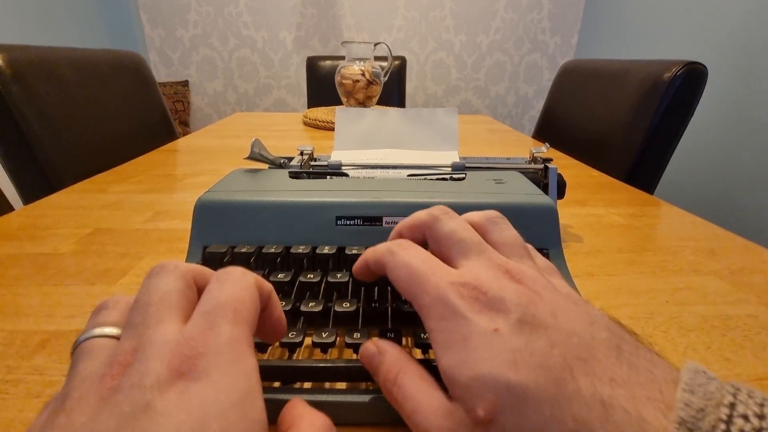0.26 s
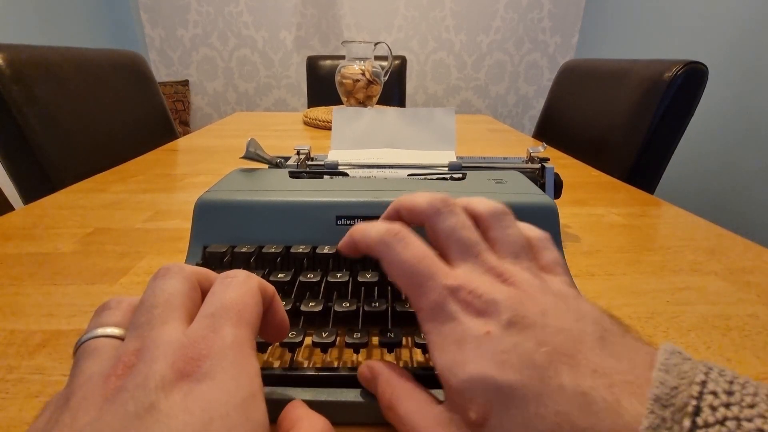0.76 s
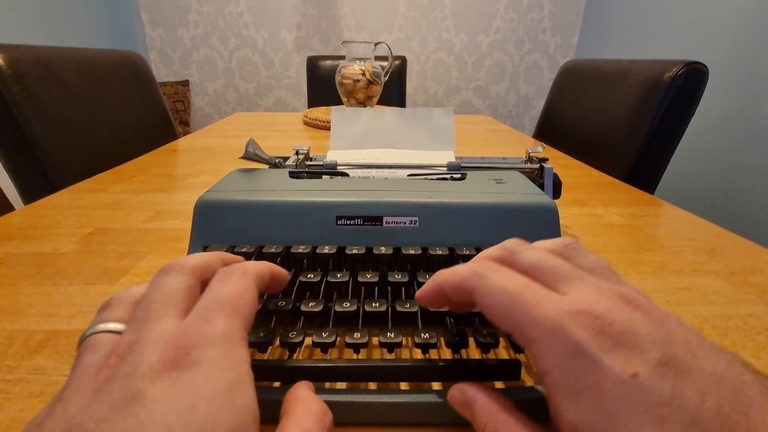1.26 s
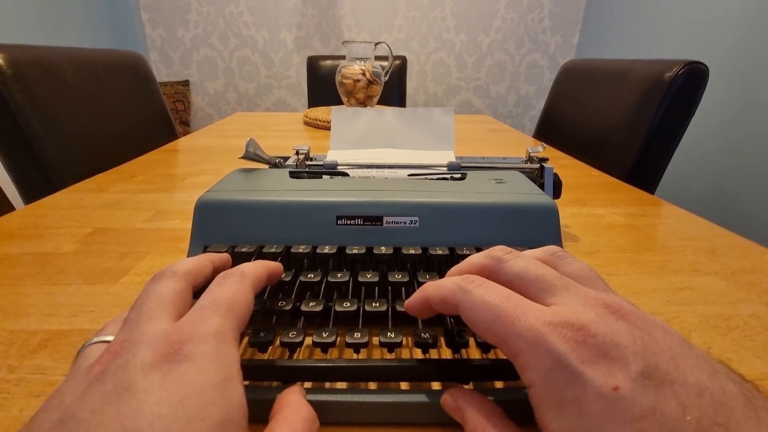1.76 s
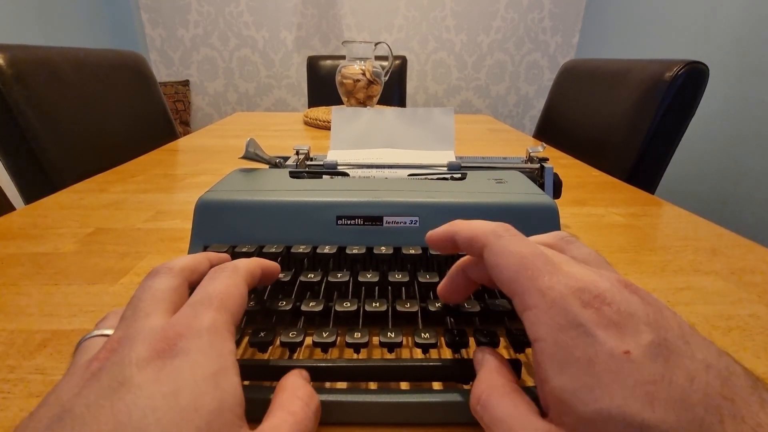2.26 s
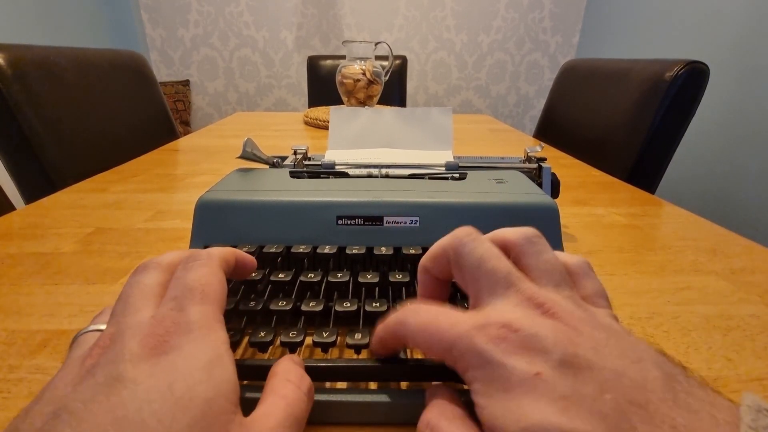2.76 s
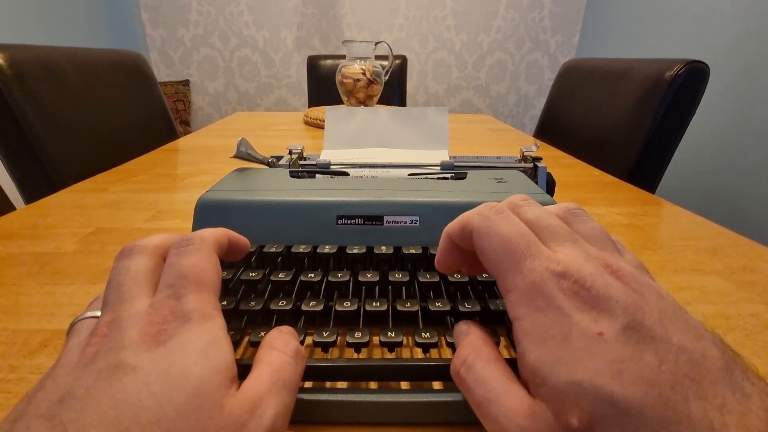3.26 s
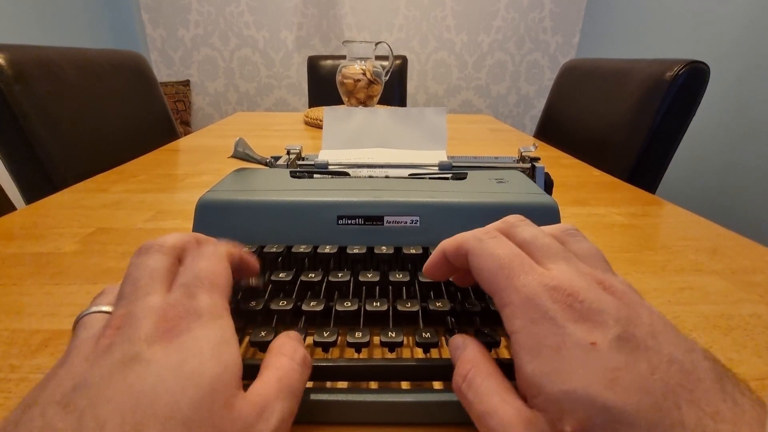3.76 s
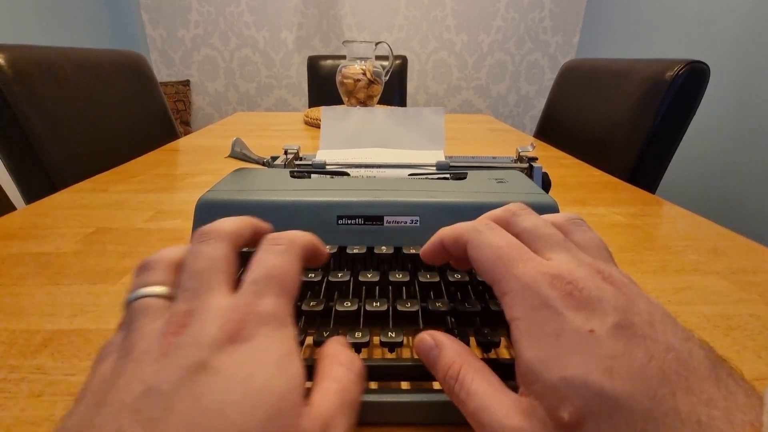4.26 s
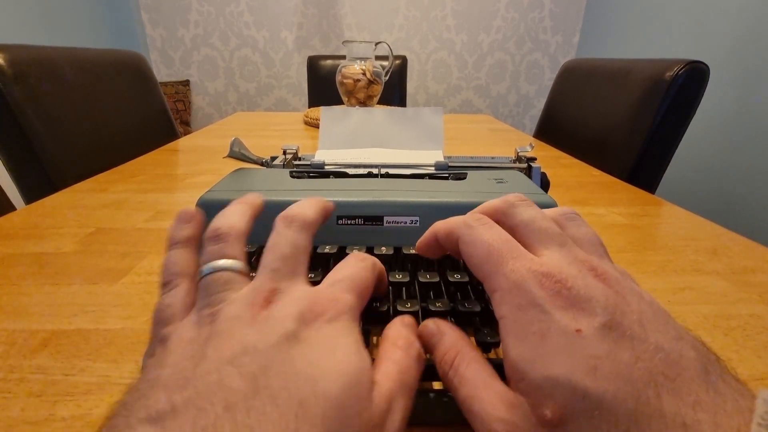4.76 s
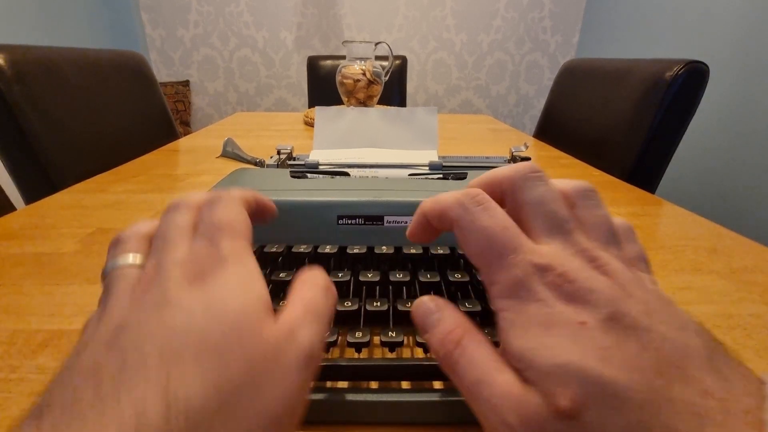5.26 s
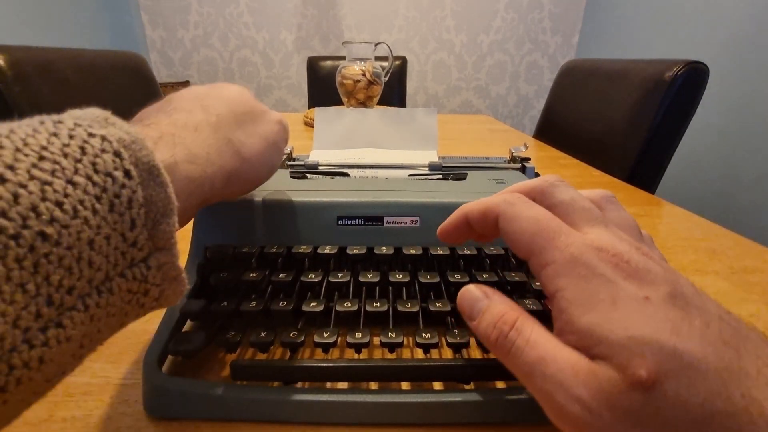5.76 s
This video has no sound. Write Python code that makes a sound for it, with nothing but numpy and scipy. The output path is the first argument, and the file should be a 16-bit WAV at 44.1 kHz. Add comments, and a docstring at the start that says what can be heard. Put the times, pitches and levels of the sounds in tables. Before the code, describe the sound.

A manual typewriter on a wooden table, heard close in a quiet, faintly humming room. One hard letter strike sits between duller space bar clunks, then a long pause, a quick run of three strikes, another strike and a space, and a final run of three. Each crack leaves a short metallic ring and low table thump. At the end the lever catches click and the carriage begins grating.

```python
"""A portable manual typewriter on a wooden table, typed on in short bursts in a quiet, faintly humming room.
Type bars crack on the platen as damped modes and ring the frame; keys and space bar thump table and case modes.
Linkages rattle as showers of tiny contacts, the escapement clicks as filtered noise bursts, springs sing on.
At the end a hand starts to push the carriage lever: catches click and ping, rails grate."""
import sys
import numpy as np
from scipy import signal
from scipy.fft import rfft, irfft
from scipy.io import wavfile

SR = 44100
rng = np.random.default_rng(int(sys.argv[2]) if len(sys.argv) > 2 else 0)


def master(y):
    """Save y as 16-bit WAV."""
    cut = np.clip(np.atleast_2d(y).T, -1, 1)
    pcm = np.round(cut * 32767)  # scale
    wavfile.write(sys.argv[1], SR, pcm.astype(np.int16))


N = 265923
T = np.arange(SR * 3 // 4) / SR  # time axis of one event, s
STEP_S = 0.026  # the carriage moves on by one letter

# Table levels are relative: each layer adds its own gain.
# letter keys: strike t/s, key travel/s, finger thump/dB, linkage/dB, key-bed thump/dB, crack/dB,
# frame ring/dB, rebound/dB, brightness/(dB per octave)
STRIKES = [(0.676, .032, -19.5, -27, -18.5, 2.5, -4, -11.5, -3.5),
           (2.696, 0.049, -31.5, -39.5, -20.5, -1, -1.5, -10.5, -7.5),
           (2.916, 0.037, -27, -29.5, -20, 0.5, -1, -7, -6.5),
           (3.187, 0.06, -27, -39, -24.5, -3, -3, -15, -8),
           (3.793, 0.039, -25, -32.5, -22.5, 3, -4.5, -13.5, -4),
           (4.854, .032, -20, -29, -24, 0.5, 1, -5, -8),
           (5.062, .043, -28.5, -34, -20.5, -2.5, 0, -4.5, -5),
           (5.254, 0.032, -24.5, -25.5, -20.5, 1, -2.5, -1.5, -5)]
# space bar pressed: t/s, click/dB, thump/dB, linkage/dB, travel to stop/s, clunk/dB
SPACE_DOWNS = [(0.2512, -17, -20, -34, 0.023, 1), (0.869, -20.5, -22, -37.5, .032, -14),
               (4.2297, -23.5, -24, -38, .036, -9.5)]
# space bar let go: t/s, click/dB, thump/dB, clunk/dB
SPACE_UPS = [(0.952, -20.5, -24.5, -13), (4.334, -23.5, -25.5, -8)]
# catches of the carriage lever: t/s, click/dB, ping f/Hz, ping/dB
CATCHES = [(5.874, -43.5, 4140, -23), (5.8885, -43.5, 2960, -17), (5.9799, -29, 3000, -13.5)]
# platen under a type slug, nominal modes: f/Hz, level/dB, t60/s
PLATEN_MODES = [(1180, -15.5, 0.0037), (1460, -10, 0.0024), (3000, -8.5, 0.0037), (3800, -10, 0.0071),
                (7010, -2.5, 0.0054), (8770, 2.5, 0.0034), (13380, 2, 0.0011)]
# linkage spectrum: f/Hz, level/dB
LINKAGE_COLOUR = [(350, -39.5), (600, 3.5), (779, -3.5), (1680, -4.5), (3120, -2.5), (3680, -1),
                  (4780, -4.5), (7620, -7), (11200, -15.5), (12500, -9.5), (14900, -12.5), (16000, -13)]
# case spectrum: f/Hz, level/dB
CASE_COLOUR = [(35, -28.5), (70, 7), (130, 13), (260, 0), (380, 3.5), (490, -8), (680, -1.5), (1100, -4),
               (1700, -12), (3000, -17.5), (8000, -43.5)]


def undb(db):
    """Decibels to gain."""
    return 10 ** (np.asarray(db) / 20)


def unit(x):
    """Scale to unit energy in each channel."""
    return x / np.sqrt(np.sum(x ** 2, axis=-1, keepdims=True))


def read(table, hz):
    """A table's value, interpolated on a log-frequency axis."""
    f, value = np.transpose(table)
    return np.interp(np.log(np.maximum(hz, 1)), np.log(f), value)


def colour(x, spectrum):
    """Filter by a (Hz, dB) spectrum."""
    size = x.shape[-1]
    gain = undb(read(spectrum, np.fft.rfftfreq(size, 1 / SR)))
    return irfft(rfft(x) * gain, size)


def add(track, s, piece):
    """Mix a piece into a track at time s."""
    i = max(int(s * SR), 0)
    track[..., i:i + piece.shape[-1]] += piece[..., :N - i]


def through(force, response):
    """Play a force through a stereo response."""
    return signal.fftconvolve(np.atleast_2d(force), response, axes=-1)[:, :N]


def field(size, wide_hz=420):
    """Diffuse noise at two ports: alike in the bass, unrelated in the treble."""
    mid, side = rng.standard_normal((2, size))
    side = colour(side, [(wide_hz / 4, -13), (wide_hz, 0)])
    return np.array([mid + side, mid - side])


def mode(hz, t60, phase=0):
    """One exponentially decaying resonance."""
    return np.sin(2 * np.pi * hz * T + phase) * np.exp(-np.log(1000) * T / t60)


def chime(modes, t60, scatter_db=2):
    """Distinct modes, excited a little differently by every blow, in a random phase at each port."""
    out = 0
    for hz, db in modes:
        gain = undb(db + scatter_db * rng.standard_normal())
        out = out + gain * mode(hz, t60, 2 * np.pi * rng.random((2, 1)))
    return unit(out)


def tick(spectrum, decay_s):
    """The dry snap of a struck part: a decaying burst of coloured noise."""
    t = T[T < 0.05]
    snap = unit(colour(field(len(t)), spectrum) * np.exp(-t / decay_s))
    return np.pad(snap, ((0, 0), (0, len(T) - len(t))))


def shower(rate, scatter_db):
    """Tiny contacts at random moments (rate per s), most of them faint; rms 1."""
    chance, size = rng.random(N), rng.exponential(size=N)
    contacts = (chance < rate / SR) * undb(scatter_db * np.minimum(size, 4))
    return np.sqrt(N) * unit(contacts * rng.choice([-1, 1], N))


def blows(times, db, contact_s):
    """Energy delivered by blows that each last a moment."""
    energy = np.zeros(N)
    for s, level_db in zip(times, db):
        add(energy, s, (undb(level_db) * unit(np.exp(-T / contact_s))) ** 2)
    return energy


def ring_out(energy, spectrum):
    """Countless close modes of machine and room store blow energy; each octave loses it at its own rate."""
    # decay of machine and room together: f/Hz, t60/s
    decay = [(100, 0.54), (400, 0.24), (1000, 0.36), (3000, 0.34), (7000, 0.31), (14000, 0.24)]
    bins = rfft(np.sqrt(N) * unit(colour(field(N), spectrum)))
    octave = np.round(np.log2(np.maximum(np.fft.rfftfreq(N, 1 / SR), 64)))
    out = 0
    for k in np.unique(octave):
        loss = np.log(1e6) / (read(decay, 2 ** k) * SR)  # energy share lost per sample
        stored = signal.lfilter([loss], [1, loss - 1], energy + 1e-18)
        out = out + irfft(bins * (octave == k), N) * np.sqrt(stored)
    return out


def room(air_db=-68.5, hum_db=-1, waver_rad=0.26):
    """Still air as coloured noise and a faint hum of partials whose phases wander slowly."""
    # air spectrum: f/Hz, level/dB
    air_colour = [(15, -43.5), (25, -16), (53, 3), (120, -10), (149, 3), (175, -13), (317, -8.5),
                  (451, -18.5), (531, -10.5), (591, -19), (695, -14.5), (962, -27.5), (1100, -13.5),
                  (1520, -35.5), (4000, -40), (9500, -51), (16000, -46.5)]
    # hum partials: f/Hz, level/dB
    hum = [(48.4, -81), (150.7, -87.5), (317.6, -79.5), (532.9, -79), (640.6, -77.5), (694.4, -81.5),
           (1039, -88), (1087, -80), (1136, -91), (1238, -86.5)]
    out = undb(air_db) * np.sqrt(N) * unit(colour(field(N), air_colour))
    t, knots = np.arange(N) / SR, np.linspace(0, N / SR, 40)
    for hz, db in hum:
        drift = np.interp(t, knots, np.cumsum(waver_rad * rng.standard_normal(len(knots))))
        port_phase = rng.random((2, 1)) * hz / 300
        out = out + undb(db + hum_db) * np.sqrt(2) * np.sin(2 * np.pi * hz * t + drift + port_phase)
    return out


def carriage(thud_db=24, slide_db=-1):
    """The hand nudges the lever, its catches ping and the carriage starts to grate along its rails."""
    # hand pushing on the lever: t/s, level/dB
    nudges = [(5.703, -46), (5.789, -46), (5.905, -33.5), (5.982, -26.5)]
    # carriage rocking on its rails: f/Hz, level/dB, t60/s
    rocking_modes = [(71, 0.5, 0.41), (143.6, 8.5, 0.16), (210, -3, 0.16), (286, -9, 0.23)]
    # grating rail spectrum: f/Hz, level/dB
    rail_colour = [(180, -41), (300, -13.5), (470, -14), (978, -2.5), (1720, -7.5), (3400, -8), (4750, -13),
                   (14000, -26.5), (16000, -22.5)]
    # carriage sliding, envelope: t/s, level/dB
    rail_push = [(5.889, -43), (5.898, -42), (5.974, -37.5), (5.978, -34.5), (6.03, -46.5)]
    body = sum(undb(db) * mode(hz, t60) for hz, db, t60 in rocking_modes)
    body = unit(body * (1 - np.exp(-T / 0.0059)))
    out = np.zeros((2, N))
    for s, db in nudges:
        add(out, s, undb(db + thud_db) * body)
    for s, _, ping_hz, ping_db in CATCHES:
        add(out, s, undb(ping_db) * chime([(ping_hz, 0)], t60=0.045))
    push = undb(np.interp(np.arange(N) / SR, *np.transpose(rail_push), left=-120))
    grit = np.array([shower(rate=2700, scatter_db=0.0) for port in range(2)])
    return out + undb(slide_db) * push * np.sqrt(N) * unit(colour(grit, rail_colour))


def incidentals(hard_db=-4, jiggle_s=0.0064, catch_ring_db=-1):
    """An earlier stroke ends, keys are lightly touched, faint treble hisses; the lever's catches click."""
    # end of an earlier stroke at the start, then light touches on the keys:
    # t/s, thump/dB, case clack re thump/dB, linkage/dB
    light_knocks = [(0.001, -25, 0.5, -24.5), (0.18, -37, -16, -63), (4.51, -49.5, -4.5, -60),
                    (4.791, -43, -0.5, -54)]
    # faint treble ringing or hiss between the bursts: t/s, length/s, level/dB
    hisses = [(.46, 0.77, -64.5), (1.053, 0.28, -65), (4.756, 0.19, -61.5), (5.64, 0.35, -80.5)]
    knocks = [(s, thump_db, clack_db, hard_db) for s, thump_db, clack_db, _ in light_knocks]
    rattles = [(s, jiggle_s, linkage_db) for s, _, _, linkage_db in light_knocks] + list(hisses)
    clicks = [(s, click_db, catch_ring_db) for s, click_db, _, _ in CATCHES]
    return knocks, rattles, clicks


def springs(clicks, db=-7, t60=0.46):
    """Every click plucks the return springs, which sing on faintly."""
    # return springs: f/Hz, level/dB
    spring_modes = [(1230, -6.5), (1510, -14.5), (2700, -10), (2900, -8.5), (3198, -15), (3542, -19.5),
                    (3750, -18.5), (4350, -18.5), (4834, -17.5), (5383, -23)]
    out = np.zeros((2, N))
    for s, click_db, ring_db in clicks:
        add(out, s, undb(db + click_db + ring_db) * chime(spring_modes, t60, scatter_db=1.5))
    return out


def scrapes(key_db=19, space_db=5, decay_s=0.0037):
    """A lever scrapes out of its slot, short and bright; level follows the key's linkage or space bar's click."""
    # scraping steel spectrum: f/Hz, level/dB
    scrape_colour = [(2000, -24.5), (4000, -5), (7000, 0), (10000, 1), (14000, -0.5), (16000, -1.5)]
    starts = [(s - travel_s, linkage_db + key_db) for s, travel_s, _, linkage_db, *_ in STRIKES]
    starts += [(s, click_db + space_db) for s, click_db, *_ in SPACE_DOWNS]
    out = np.zeros((2, N))
    for s, db in starts:
        scrape = unit(tick(scrape_colour, decay_s) * (1 - np.exp(-T / 0.0019)))
        add(out, s, undb(db) * scrape)
    return out


def linkages(rattles, rise_s=0.0032, dry_db=-3, ring_db=-2, faint_db=-55):
    """Levers gather speed and shower tiny contacts; the faintest entries become a smooth treble hiss."""
    # faint treble spectrum: f/Hz, level/dB
    hiss_colour = [(800, -17), (2800, 4), (4500, -3), (6800, -3), (9500, -25), (16000, -29.5)]
    motion, swell = np.zeros((2, N))
    for s, length_s, db in rattles:
        if db > faint_db:
            add(motion, s, undb(db) * (1 - np.exp(-T / rise_s)) * (T < length_s))
        else:
            add(swell, s, undb(db) * np.sin(np.pi * np.minimum(T / length_s, 1)))
    force = motion * shower(rate=1600, scatter_db=4.5)
    dry_rattle = undb(dry_db) * through(force, tick(LINKAGE_COLOUR, decay_s=0.00083))
    ringing = undb(ring_db) * ring_out(motion ** 2, LINKAGE_COLOUR)
    hiss = swell * np.sqrt(N) * unit(colour(field(N), hiss_colour))
    return dry_rattle + ringing + hiss


def escapement(clicks, snap_db=13, ring_db=10, steel_db=5):
    """Pawls and catches snap and set the same small steel parts ringing every time."""
    out, force = np.zeros((2, N)), np.zeros(N)
    for s, db, own_ring_db in clicks:
        add(out, s, undb(db + snap_db) * tick(LINKAGE_COLOUR, decay_s=0.0028))
        force[int(s * SR)] = undb(db + own_ring_db)
    steel = unit(colour(field(len(T)), LINKAGE_COLOUR) * np.exp(-T / 0.025))
    times, db, own_ring_db = np.transpose(clicks)
    energy = blows(times, db + own_ring_db + ring_db, contact_s=0.0026)
    return out + undb(steel_db) * through(force, steel) + ring_out(energy, LINKAGE_COLOUR)


def space_bar(slap_db=-4, rise_s=0.001):
    """The long bar meets its stops, down or up, with a dull clunk and slaps the case."""
    # space bar: f/Hz, level/dB, t60/s
    bar_modes = [(63, 7, 0.18), (123, -6, 0.11), (208, -2, 0.11), (336, 7.5, 0.05), (403, 7, 0.033),
                 (607, -9, .04), (735, 3, 0.082)]
    clunk = sum(undb(mode_db) * mode(hz, t60) for hz, mode_db, t60 in bar_modes)
    clunk = unit(clunk * (1 - np.exp(-T / rise_s)))
    stops = [(s + travel_s, db) for s, *_, travel_s, db in SPACE_DOWNS]
    stops += [(s + STEP_S, db) for s, *_, db in SPACE_UPS]
    out = np.zeros((2, N))
    for s, db in stops:
        add(out, s, undb(db) * (clunk + undb(slap_db) * tick(CASE_COLOUR, decay_s=0.016)))
    return out


def space_presses(ring_db=6.0, clack_db=-6, hard_db=-1.5, stop_db=-4, stop_clack_db=1, stop_hard_db=1,
                  rattle_s=0.039, slack_s=0.016, slack_db=-44):
    """The thumb takes up the slack, trips the pawl and drives the space bar rattling down to its stop."""
    knocks, rattles, clicks = [], [], []
    for s, click_db, thump_db, linkage_db, travel_s, _ in SPACE_DOWNS:
        knocks.append((s, thump_db, clack_db, hard_db))
        knocks.append((s + travel_s, thump_db + stop_db, stop_clack_db, stop_hard_db))
        rattles += [(s - slack_s, slack_s, slack_db), (s, rattle_s, linkage_db)]
        clicks.append((s, click_db, ring_db))
    return knocks, rattles, clicks


def space_releases(ring_db=4, clack_db=-1, hard_db=-14, slide_db=-11, stop_db=-1, stop_clack_db=-1.5,
                   stop_hard_db=5, catch_db=-4):
    """The bar rises, the pawl lets go, the carriage runs on one step and is caught."""
    knocks, rattles, clicks = [], [], []
    for s, click_db, thump_db, _ in SPACE_UPS:
        knocks.append((s, thump_db, clack_db, hard_db))
        knocks.append((s + STEP_S, thump_db + stop_db, stop_clack_db, stop_hard_db))
        rattles.append((s, STEP_S, click_db + slide_db))
        clicks += [(s, click_db, ring_db), (s + STEP_S, click_db + catch_db, ring_db)]
    return knocks, rattles, clicks


def key_returns(rest_clack_db=-7, rest_hard_db=1.5, step_db=-4, step_clack_db=-2, step_hard_db=4.0,
                fall_s=0.044, fall_db=-37):
    """The bar falls back, the key knocks on its rest, then the escapement clicks and jolts the carriage."""
    # keys coming up: escapement click t/s, click/dB, ring/dB, time since key hit its rest/s, thump/dB
    returns = [(0.8015, -18, 5, 0.029, -21), (2.8371, -17.5, 5, 0.031, -21), (3.0444, -14, 2, 0.018, -23),
               (3.2927, -13.5, 3.5, .042, -24), (3.9279, -13.5, 0.5, 0.013, -24),
               (5.018, -17, 6.5, .018, -22.5), (5.188, -17.5, 4, .058, -24.5),
               (5.3613, -18, 6.5, 0.014, -26)]
    knocks, rattles, clicks = [], [], []
    for s, click_db, ring_db, lead_s, thump_db in returns:
        knocks.append((s - lead_s, thump_db, rest_clack_db, rest_hard_db))
        knocks.append((s, thump_db + step_db, step_clack_db, step_hard_db))
        rattles.append((s - fall_s, fall_s, fall_db))
        clicks.append((s, click_db, ring_db))
    return knocks, rattles, clicks


def key_presses(finger_clack_db=-5, finger_hard_db=3.5, shake_db=-26, shake_clack_db=-6, shake_hard_db=3,
                bed_clack_db=-13, bed_hard_db=1.5, bottom_s=0.028, swing_s=0.01, swing_db=-26):
    """The finger lands, the linkage rattles and speeds up, the strike shakes the machine, the key hits its bed."""
    knocks, rattles = [], []
    for s, travel_s, finger_db, linkage_db, bed_db, *_ in STRIKES:
        knocks.append((s - travel_s, finger_db, finger_clack_db, finger_hard_db))
        knocks.append((s, shake_db, shake_clack_db, shake_hard_db))
        knocks.append((s + bottom_s, bed_db, bed_clack_db, bed_hard_db))
        rattles.append((s - travel_s, travel_s, linkage_db))
        rattles.append((s - swing_s, swing_s, swing_db))  # last, fastest part of the bar's swing
    return knocks, rattles, []


def key_stops(knocks, thump_db=21, boom_db=17, clack_db=15, case_modes_db=15, case_ring_db=17,
              spread_rad=0.11, rise_s=0.011):
    """Each stop shakes the table and clacks in the case; hardness tilts the blow to higher table modes."""
    # machine on its feet and the table top: f/Hz, level/dB, t60/s
    table_modes = [(61, -12.5, 0.31), (78.15, 10, 0.18), (133, 0.5, 0.19), (162.9, -16, 0.59),
                   (195.9, -10.5, 0.32), (261, -4, 0.19), (352, -16, 0.051), (387, -14, 0.14)]
    # cast case and key bed: f/Hz, level/dB
    case_modes = [(699, 3.5), (770, -14), (915, -0.5), (1012, -3.5), (1090, -5.5)]
    # table and room boom spectrum: f/Hz, level/dB
    boom_colour = [(30, -21), (55, -9), (75, 8), (110, -10), (150, -9), (260, -7), (380, -18), (500, -28.5),
                   (1500, -56)]
    mode_hz, mode_db, _ = np.transpose(table_modes)
    # higher table modes reach the two ports further out of step
    ports = np.array([[1], [-1]])
    shapes = np.array([mode(hz, t60, spread_rad * hz / 100 * ports * (-1) ** k)
                       for k, (hz, _, t60) in enumerate(table_modes)])
    shapes = shapes * (1 - np.exp(-T / rise_s))
    out = np.zeros((2, N))
    for s, db, own_clack_db, hard_db in knocks:
        weights = undb(mode_db + hard_db * np.log2(mode_hz / mode_hz[0]))
        add(out, s, undb(db + thump_db) * unit(np.tensordot(weights, shapes, 1)))
        clack = undb(clack_db) * tick(CASE_COLOUR, decay_s=0.0097)
        clack = clack + undb(case_modes_db) * chime(case_modes, t60=0.22)
        add(out, s, undb(db + own_clack_db) * clack)
    times, db, own_clack_db = np.transpose(knocks)[:3]
    case = ring_out(blows(times, db + own_clack_db + case_ring_db, contact_s=0.003), CASE_COLOUR)
    boom = ring_out(blows(times, db + boom_db, contact_s=0.018), boom_colour)
    return out + case + boom


def chatter(db=-3, start_s=0.012, gap_s=0.013, fade_db=-3, t60=0.011, count=6):
    """Shaken by a strike, neighbouring type bars clink in the basket, each softer than the last."""
    out = np.zeros((2, N))
    for s, *_, ring_db, _, _ in STRIKES:
        for k, (late, tune) in enumerate(rng.random((count, 2))):
            bar = [(hz * (0.85 + 0.3 * tune), mode_db) for hz, mode_db, _ in PLATEN_MODES[2:5]]
            clink = undb(db + ring_db + fade_db * k) * chime(bar, t60, scatter_db=5)
            add(out, s + start_s + gap_s * (k + late), clink)
    return out


def type_bars(crack_db=6, splash_db=-3, ring_db=10, modes_db=6, rise_s=0.00014, rebound_s=0.0085,
              port_lag_s=0.00008):
    """The slug cracks on the platen, rebounds once and leaves the frame ringing."""
    # steel frame and type basket: f/Hz, level/dB
    frame_modes = [(1378, -4.5), (2210, -8), (2461, -5), (2564, -4.5), (2725, -6), (2842, -4.5),
                   (2930, -4.5), (3036, 1.5), (3166, -6.5), (3227, -0.5), (3496, -3.5), (3970, -7),
                   (4180, -8), (5130, -13.5), (5620, -14.5), (6470, -11.5)]
    # frame spectrum: f/Hz, level/dB
    frame_colour = [(180, -31), (300, -13), (494, -18), (900, -7.5), (978, -7), (1080, -7.5), (1690, -17.5),
                    (1900, -9.5), (2700, -8.5), (2930, -5.5), (4590, -11.5), (6620, -11), (9240, -19.5),
                    (13800, -19.5), (16000, -23)]
    out = np.zeros((2, N))
    for s, *_, db, own_ring_db, rebound_db, bright_db in STRIKES:
        detune = 1 + 0.026 * rng.standard_normal(len(PLATEN_MODES))  # every strike differs a little
        crack = 0
        for k, (hz, mode_db, t60) in enumerate(PLATEN_MODES):
            gain = undb(mode_db + bright_db * np.log2(hz / 3000))
            crack = crack + (-1) ** k * gain * mode(hz * detune[k], t60)
        crack = unit(crack * (1 - np.exp(-T / rise_s)))  # ribbon and paper cushion the blow
        ports = np.array([crack, np.roll(crack, int(port_lag_s * SR))])
        splash = undb(splash_db) * tick(frame_colour, decay_s=0.0038)
        add(out, s, undb(db + crack_db) * (ports + splash))
        late_s = rebound_s * (1 + 0.057 * rng.standard_normal())
        rebound = 0.5 * ports + tick(frame_colour, decay_s=0.0006)
        add(out, s + late_s, undb(db + crack_db + rebound_db) * rebound)
        frame_ring = chime(frame_modes, t60=0.21, scatter_db=1.0)
        add(out, s, undb(db + own_ring_db + modes_db) * frame_ring)
    times, *_, db, own_ring_db, _, _ = np.transpose(STRIKES)
    energy = blows(times, db + own_ring_db + ring_db, contact_s=0.00085)
    return out + ring_out(energy, frame_colour)


def shell(x, dip_db=-1.0):
    """The sheet-metal shell lifts the sound at each of its resonances, over a slight overall dip."""
    # shell resonances: f/Hz, width/Hz, lift re the dip/dB
    resonances = [(1358, 14, 2), (2090, 54, 2), (2797, 200, 4.5), (3300, 220, 3), (5160, 110, 2.5),
                  (5440, 60, 3), (6610, 68, 4)]
    hz = np.fft.rfftfreq(N, 1 / SR)
    peaks = sum((undb(lift_db) - 1) / (1 + 2j * (hz - centre_hz) / width_hz)
                for centre_hz, width_hz, lift_db in resonances)
    return irfft(rfft(x) * undb(dip_db) * (1 + peaks), N)


def scene():
    """Knocks, rattles and clicks of all movements drive the sounding parts."""
    # knocks: t/s, thump/dB, clack/dB, hardness/(dB per octave)
    # rattles: t/s, length/s, level/dB; clicks: t/s, level/dB, ring/dB
    movements = key_presses(), key_returns(), space_presses(), space_releases(), incidentals()
    knocks, rattles, clicks = (sum(rows, []) for rows in zip(*movements))
    metal = type_bars() + chatter() + escapement(clicks) + linkages(rattles) + scrapes() + carriage()
    return shell(metal) + springs(clicks) + key_stops(knocks) + space_bar() + room()


def record(dry, low_cut_hz=38, top_hz=15900):
    """The microphone sheds the deepest bass, peaks clip at full scale and the top is cut steeply."""
    low_cut = signal.butter(2, low_cut_hz, "high", fs=SR, output="sos")
    top_cut = signal.ellip(10, 0.2, 80, top_hz, fs=SR, output="sos")
    sound = np.clip(signal.sosfilt(low_cut, dry), -1, 1)
    return signal.sosfilt(top_cut, sound)


dry = scene()
out = record(dry)
master(out)
```